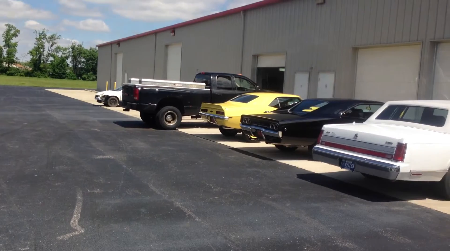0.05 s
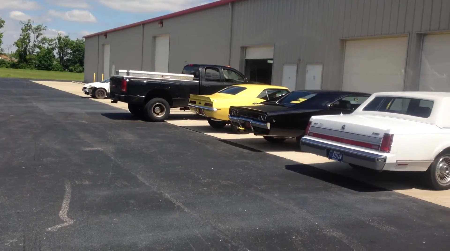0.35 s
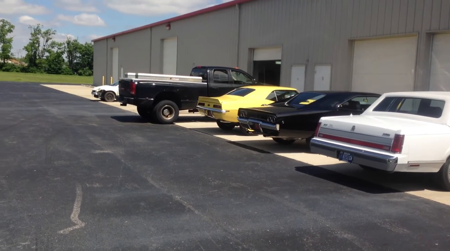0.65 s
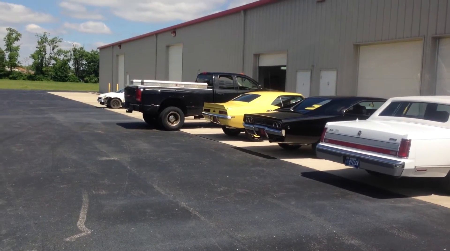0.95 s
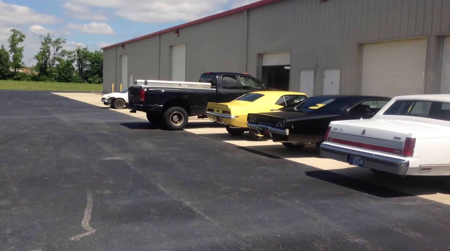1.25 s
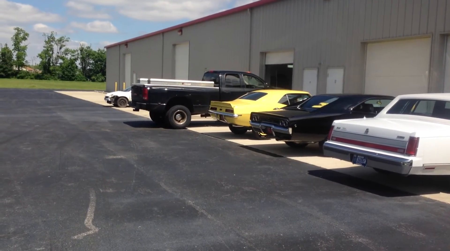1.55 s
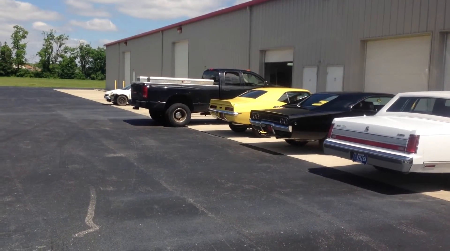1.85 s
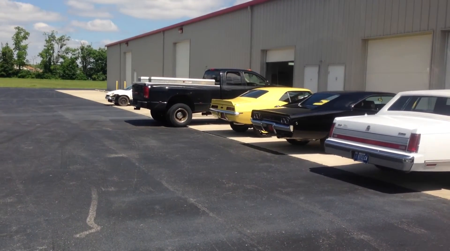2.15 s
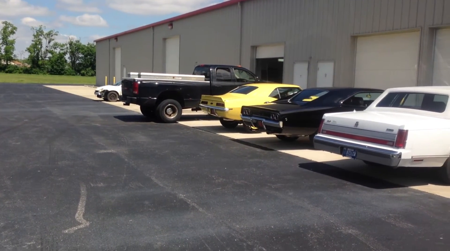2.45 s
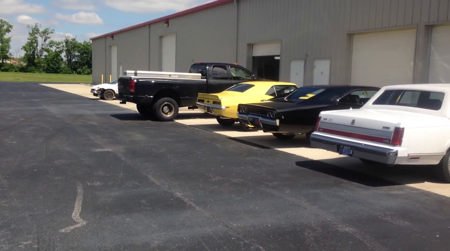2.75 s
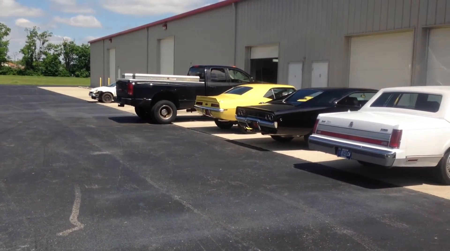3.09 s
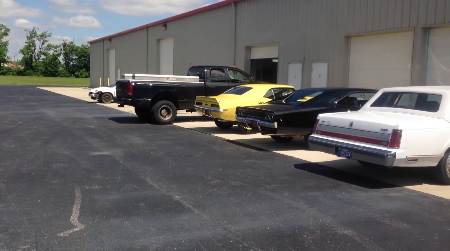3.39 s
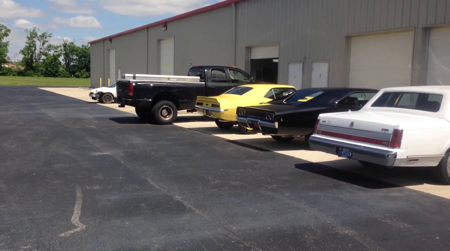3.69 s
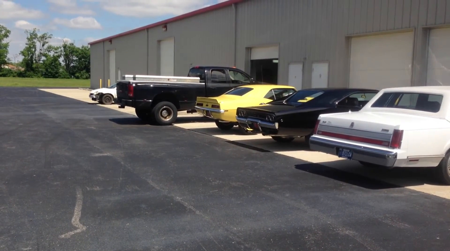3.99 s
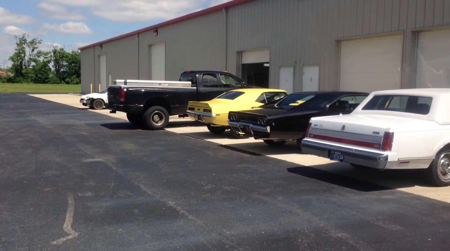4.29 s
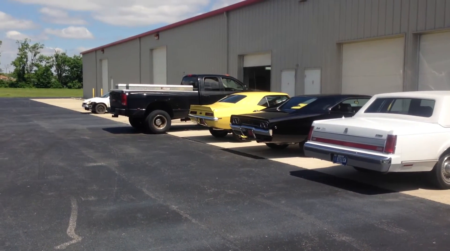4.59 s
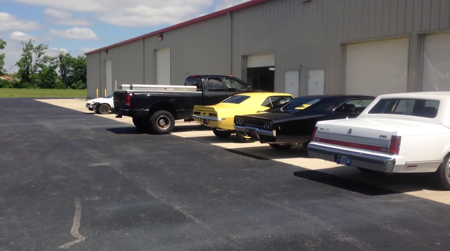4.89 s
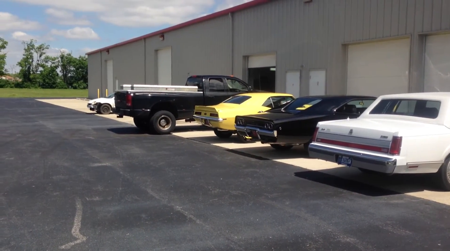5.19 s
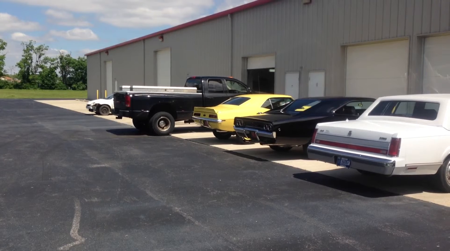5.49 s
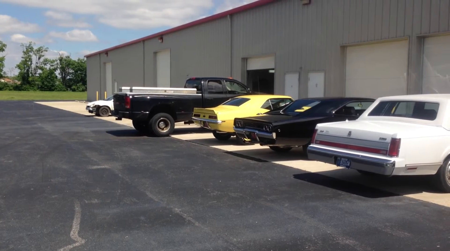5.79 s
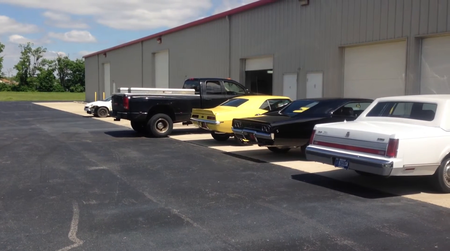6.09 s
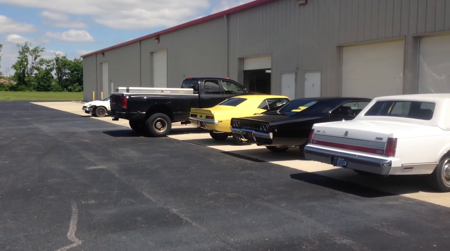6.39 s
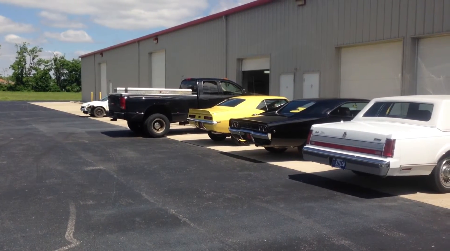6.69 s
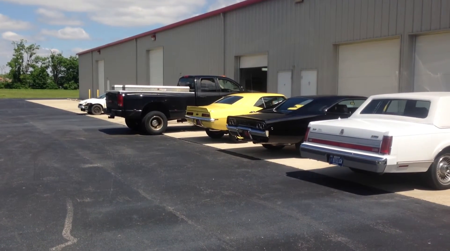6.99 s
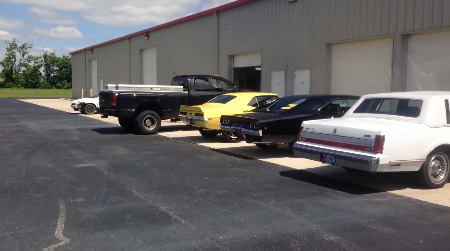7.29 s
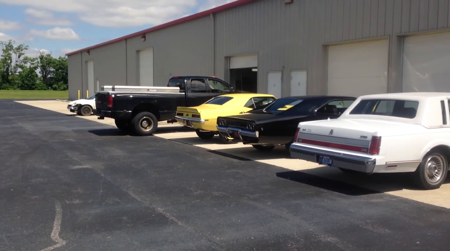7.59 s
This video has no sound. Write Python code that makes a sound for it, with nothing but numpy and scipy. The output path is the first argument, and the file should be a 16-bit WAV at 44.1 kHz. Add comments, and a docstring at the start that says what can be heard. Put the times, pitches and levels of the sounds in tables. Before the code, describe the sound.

A V8 car engine idles with a rough, loping rhythm, its exhaust booming and barking in uneven bursts with little spits of hiss and soft pops. Near the end it revs once with a pop, then climbs much harder with a loud crack and a raspy roar. It is heard from nearby in an open parking lot, with short echoes off a wall and a faint hiss of wind.

```python
"""Loping V8, revved twice

A V8 with a wild camshaft lopes at idle beside a steel workshop, then is revved twice, the second time
hard. Weak firings alternate with runs of strong ones that boom and bark in the pipes and spit hiss;
the hardest pop or bang. The wall and the parked cars answer, over a faint hiss of wind."""
import sys
import numpy as np
from scipy import signal
from scipy.fft import rfft, irfft, next_fast_len
from scipy.io import wavfile
from scipy.ndimage import uniform_filter1d, minimum_filter1d

SR = 44100
rng = np.random.default_rng(int(sys.argv[2]) if len(sys.argv) > 2 else 0)


def wav_record(signal):
    """Record a signal, one row per channel, as 16-bit PCM in the file named by sys.argv[1]."""
    frames = np.transpose(np.atleast_2d(signal))
    bounded = np.clip(frames, -1, 1)
    # unit amplitude maps onto the largest positive 16-bit level
    quanta = np.round(bounded * 32767).astype(np.int16)
    wavfile.write(sys.argv[1], SR, quanta)


N = 346185

# Charges that go off with a sharp pop. Each row: time in seconds, relative strength in dB.
POP_HITS = [(0.359, -32), (1.079, -34), (1.408, -24), (1.477, -23), (1.639, -34), (1.687, -23),
            (1.967, -24), (2.427, -30), (2.566, -26), (3.705, -22), (3.963, -21), (4.018, -20.5),
            (4.429, -24), (4.581, -26), (4.68, -28), (5.098, -27), (5.194, -37), (5.438, -34), (5.918, -24),
            (6.004, -34), (6.046, -46), (6.205, -25), (6.537, -16), (6.565, -9), (6.779, -21), (7.159, -24),
            (7.197, -23), (7.391, -19), (7.475, 1)]
# Hard bangs at full throttle. Each row: time in seconds, relative strength in dB.
BANG_HITS = [(7.543, -26), (7.755, -16.5)]
# The pipes' midrange ring at idle, then in the first rev. Each row: pitch in Hz, width in Hz, gain in dB.
COLD_BARK_MODES = [(301, 18.2, -5), (410.3, 25.2, -3), (519.6, 24.1, 1.5), (617.4, 16.4, -1.5),
                   (711.3, 30, -8)]
WARM_BARK_MODES = [(301.5, 34, -4), (426, 71, -3), (548.6, 49, 2.5), (575.8, 24, 1.5), (639, 29, -3.5),
                   (760, 94, -21), (820, 17, -21.5), (1054, 16, -15)]
# Tone of the bark and of the gas rasp. Each row: frequency in Hz, gain in dB.
BARK_EQ = [(40, -60), (130, -15.5), (290, -1.5), (400, 0.5), (650, 1), (740, -2), (860, -2), (1100, -9),
           (1500, -6), (3000, -16), (8000, -78)]
RASP_EQ = [(300, -63), (700, -5), (950, -2.5), (1120, 7), (1300, 0), (1900, 0), (2450, 0), (3200, -8.5),
           (5000, -27), (12000, -64)]


def amp(db):
    """Decibels as a gain."""
    return 10 ** (np.asarray(db) / 20)


def unit(x):
    """x at rms 1."""
    return x / np.sqrt(np.mean(x ** 2) + 1e-20)


def along(points, hz):
    """Read (Hz, value) points along a log frequency axis."""
    freqs, values = np.transpose(points)
    return np.interp(np.log(hz + 1), np.log(freqs + 1), values)


def curves(rows):
    """Automation: one value per sample for each column after the time."""
    times, *columns = np.transpose(rows)
    return [np.interp(np.arange(N) / SR, times, column) for column in columns]


def filtered(x, response):
    """x through a complex frequency response."""
    size = 2 * next_fast_len(N // 2 + SR // 2)
    return irfft(rfft(x, size) * response(np.fft.rfftfreq(size, 1 / SR)), size)[:N]


def causal(eq, hz):
    """Minimum-phase response with the gain of (Hz, dB) points."""
    grid = np.fft.rfftfreq(32768, 1 / SR)
    cepstrum = irfft(np.log(amp(along(eq, grid))))
    cepstrum[1:len(grid) - 1] *= 2
    cepstrum[len(grid):] = 0
    return np.interp(hz, grid, np.exp(rfft(cepstrum)))


def noise(eq):
    """Coloured noise of rms 1."""
    return unit(filtered(rng.standard_normal(N), lambda hz: amp(along(eq, hz))))


def steady(x, size):
    """x levelled to rms 1 over about size samples; faster throbs stay."""
    power = uniform_filter1d(uniform_filter1d(x * x, size), size)
    return x / np.sqrt(np.abs(power) + 1e-12)


def patchy(x, depth_db):
    """x at rms 1, its colour shifting at random from moment to moment."""
    spectrum = signal.stft(x, nperseg=512)[2]
    patches = uniform_filter1d(rng.standard_normal(spectrum.shape), size=4, axis=0)
    patches = uniform_filter1d(patches, size=10, axis=1)
    return unit(signal.istft(spectrum * amp(depth_db * unit(patches)), nperseg=512)[1][:N])


def kicks_at(times, sizes):
    """Single-sample impulses."""
    return np.bincount(np.clip(np.round(times * SR).astype(int), 0, N), sizes, N + 1)[:N]


def decaying(kicks, rise, t60):
    """Each kick swells to its own height and dies away; rise and t60 are in seconds."""
    t = np.arange(SR // 2) / SR
    shape = (1 - np.exp(-t / rise)) * amp(-60 * t / t60)
    return np.abs(signal.fftconvolve(kicks, shape / shape.max())[:N])


def swells(times, db, rise, t60):
    """Envelope of swells that start just ahead of the given times; their powers add."""
    return np.sqrt(decaying(kicks_at(times - .004, amp(db) ** 2), rise, t60))


def wind():
    """A faint, steady bed of moving air."""
    # Each row: frequency in Hz, gain in dB.
    air_eq = [(25, -9), (70, -14.5), (300, 6.5), (1500, -15.5), (5000, -16), (6900, -8.5), (8500, -25),
              (15000, -31)]
    return amp(-51) * noise(air_eq)


def echoed(x):
    """x with a quick slap that runs back along the pipe, then its slaps off the ground, the cars and the wall."""
    # Each row: delay in seconds, gain in dB.
    slaps = [(.0097, -13.5), (0.024, -13.5), (.041, -25)]
    return x + sum(amp(db) * np.pad(x, (int(delay * SR), 0))[:N] for delay, db in slaps)


def yard(x, wet_db):
    """Echoes plus three short diffuse tails, crossfaded so the reverb drifts with the air."""
    # Each row: frequency in Hz, seconds to fall by 60 dB.
    decay_times = [(100, 1), (600, 0.42), (3000, 0.23), (7000, 0.2), (14000, 0.12)]
    out = echoed(x)
    hz, t, spectra = signal.stft(rng.standard_normal((3, SR // 3)), SR, nperseg=256)
    fade = amp(-60 * t / along(decay_times, hz)[:, None])
    tails = signal.istft(spectra * fade, SR, nperseg=256)[1]
    for k, tail in enumerate(tails):
        share = np.cos(np.pi * (np.arange(N) / SR + k / len(tails)))
        out = out + amp(wet_db) * signal.fftconvolve(x * share, tail / np.linalg.norm(tail))[:N]
    return out


def pipe(x, modes, eq):
    """x rings the pipe's resonances, alternating in polarity, and is coloured by eq."""
    def ring(hz):
        return sum((-1) ** k * amp(db) * 1j * hz * width / (centre ** 2 - hz ** 2 + 1j * hz * width)
                   for k, (centre, width, db) in enumerate(modes))
    return filtered(x, lambda hz: ring(hz) * causal(eq, hz))


def heat():
    """Shares of cold, warm and hot gas in the pipes: idle, first rev and full throttle."""
    return curves([(6.2, 1, 0, 0), (6.5, 0, 1, 0), (7.42, 0, 1, 0), (7.56, 0, 0, 1)])


def strong_firings():
    """Runs of strong firings, unrolled into times and boom, bark and hiss levels."""
    # Each row: start in seconds, firings, spacing in seconds, relative boom, bark and hiss in dB.
    runs = [(0.126, 1, 0.0, -48, -41, -48.0), (0.203, 2, 0.046, -38.5, -40, -49),
            (0.362, 4, 0.065, -41, -40.5, -47), (0.71, 3, 0.065, -35, -38, -47.5),
            (1.017, 3, 0.058, -36.5, -38.5, -46.5), (1.248, 2, 0.053, -35.5, -44, -47.5),
            (1.408, 3, 0.051, -36.5, -39, -49), (1.586, 5, 0.055, -38, -40, -48),
            (1.866, 1, 0.065, -45, -50, -47.5), (1.962, 4, 0.066, -35.0, -41, -49),
            (2.261, 1, 0.03, -36, -39.5, -47.5), (2.426, 1, 0.0, -34, -39.5, -57),
            (2.505, 3, 0.038, -46, -41.5, -48.5), (2.724, 1, 0.0, -38, -50, -52),
            (2.852, 4, 0.052, -36, -42, -50), (3.166, 3, 0.052, -37, -41, -47.5),
            (3.401, 1, 0.0, -36, -46, -52.5), (3.462, 2, 0.03, -43, -40.5, -49),
            (3.706, 2, 0.06, -42, -41, -47.5), (3.897, 1, 0.0078, -42, -51, -50),
            (3.962, 4, 0.056, -38.5, -43, -46.5), (4.308, 2, 0.061, -37.5, -43.5, -48.5),
            (4.432, 2, 0.071, -38.5, -41.5, -49), (4.581, 1, 0.0, -49, -48, -48.0),
            (4.679, 3, 0.043, -37.5, -41, -48), (4.857, 1, 0.0, -43, -43, -52.0),
            (5.019, 3, 0.086, -36, -38, -48.5), (5.287, 1, 0.019, -38.5, -45, -53),
            (5.444, 1, 0.0, -36.5, -37, -46.5), (5.484, 1, 0.0, -38, -40.5, -45.5),
            (5.538, 2, 0.066, -42, -40, -51.0), (5.638, 2, 0.025, -38, -41, -50.0),
            (5.73, 2, 0.062, -41, -48, -51.5), (5.921, 3, 0.066, -36.5, -41, -48),
            (6.209, 3, 0.054, -38.0, -40.5, -47), (6.535, 2, 0.097, -27, -26.5, -50),
            (6.786, 2, 0.023, -30, -26.5, -54), (6.999, 1, 0.0, -31, -27.5, -50),
            (7.212, 2, 0.034, -34, -28, -48), (7.471, 1, 0.011, -26.5, -17, -42)]
    return np.transpose([(start + k * spacing, boom, bark, hiss)
                         for start, count, spacing, boom, bark, hiss in runs for k in range(count)])


def crank():
    """Firing rate and phase in cycles: each strong firing kicks the crank ahead, then it sags."""
    # Idle and two revs. Each row: time in seconds, firings per second before the lope is added.
    speed = [(0, 72), (6.2, 66), (6.4, 85.4), (6.55, 112.6), (6.65, 121), (6.77, 141), (7.0, 139),
             (7.3, 136), (7.44, 164), (7.55, 200), (7.6, 235), (7.68, 244), (7.75, 262), (7.85, 262)]
    lope_hz = 4
    times = strong_firings()[0]
    surge = decaying(kicks_at(times, np.ones(len(times))), rise=0.0999, t60=0.9)
    rate = curves(speed)[0] + lope_hz * (surge - surge.mean())
    cycles = np.cumsum(rate) / SR
    return rate, cycles - cycles[-1]


def firings(rate, cycles):
    """One pressure pulse per firing: ragged at idle, more even on the throttle."""
    # The two banks reach the ear unequally. Each entry: a cylinder's level in dB, in firing order.
    cylinder_db = [-1.5, -5.5, -1.5, 5, -9.5, -0.5, -15, -1]
    # Each row: time in seconds, scale of the scatter in strength and timing.
    roughness = [(6.3, 1.2), (6.6, 0.7), (7.2, 0.71), (7.45, 0.6), (7.6, 0.4), (7.85, 0.6)]
    onsets = np.flatnonzero(np.diff(np.floor(cycles)))
    countdown = np.round(-cycles[onsets]).astype(int)
    time_scatter, size_scatter = rng.standard_normal((1024, 2))[countdown].T
    rough = curves(roughness)[0][onsets]
    bank_db = np.take(cylinder_db, -countdown, mode="wrap")
    size_db = bank_db + 3.75 * rough * size_scatter
    far_bank_delay = 0.00048 * (bank_db < 0)
    times = onsets / SR + far_bank_delay + 0.055 * rough * time_scatter / rate[onsets]
    # Each strong firing, pop or bang takes over the nearest pulse with a full charge.
    for cue in [*strong_firings()[0], *np.transpose(POP_HITS)[0], *np.transpose(BANG_HITS)[0]]:
        nearest = np.argmin(np.abs(times - cue))
        times[nearest], size_db[nearest] = cue - .001, 4
    return kicks_at(times, amp(size_db))


def gas_jet(throb):
    """On the throttle the gas jet rasps and hisses in time with the firings."""
    # Each row: time in seconds, relative rasp and hiss in dB.
    flow = [(6.2, -78, -70), (6.212, -70, -60), (6.456, -55, -41.5), (6.796, -49, -43.5), (6.952, -54, -52),
            (7.298, -47.5, -43), (7.6, -36, -30.5), (7.78, -28.5, -35), (7.85, -40, -33.5)]
    # Each row: frequency in Hz, gain in dB.
    hiss_eq = [(1650, -15.5), (3000, -13), (5200, -9.5), (6200, -5), (6900, 1), (7400, -8), (8100, -19),
               (10000, -30.5), (12500, -40), (15000, -66)]
    rasp_db, hiss_db = curves(flow)
    rasp = amp(rasp_db - 4) * noise(RASP_EQ) * steady(0.5 + throb, size=2000)
    hiss = amp(hiss_db + 0.5) * noise(hiss_eq) * steady(0.29 + throb, size=2000)
    return rasp + hiss


def spitting(throb):
    """With each strong firing the pipes spit sharply, puff out hiss and ring faintly."""
    # Tone of the puff, its bright attack and the steel. Each row: frequency in Hz, gain in dB.
    puff_eq = [(1500, -26), (2800, -12.5), (3200, -12.5), (3970, -6.5), (4630, -9.5), (5600, -8.5),
               (6400, -5.5), (6900, 0), (7400, -6), (8200, -16.5), (10000, -32), (15000, -55)]
    spit_eq = [(2000, -28), (3700, -27), (5500, -5), (7000, 15), (8500, -2.5), (10500, -11), (15000, -42)]
    clatter_eq = [(500, -44), (900, -2), (2700, -1), (3500, -18.5), (6000, -26), (12000, -67)]
    # The thin steel of the pipes. Each row: pitch in Hz, width in Hz, gain in dB.
    steel_modes = [(1010, 27, -6.5), (1084, 23, -0.5), (1404, 23, -1.5), (1565, 29, -1.5), (1748, 71, 0),
                   (1872, 38, -0.5), (2030, 38, -6), (2224, 32, 1), (2405, 64, -3.5), (2695, 22, -2.5)]
    times, _, _, hiss_db = strong_firings()
    flutter = steady(1 + 0.36 * throb, size=4000)
    puff_level = swells(times, hiss_db, rise=0.022, t60=0.14)
    spit_level = swells(times, hiss_db + 3.4 * rng.standard_normal(len(times)), rise=0.01, t60=0.097)
    puffs = amp(-1.4) * puff_level * patchy(echoed(noise(puff_eq)), depth_db=3)
    spits = amp(-6) * spit_level * patchy(noise(spit_eq), depth_db=2)
    # Some firings shake the steel much harder than others.
    flares = swells(times, hiss_db + 4.5 * rng.standard_normal(len(times)), rise=0.01, t60=0.17)
    shaking = (1.16 + unit(flares)) * flutter * rng.standard_normal(N)
    clatter = amp(-60.5) * unit(pipe(shaking, steel_modes, clatter_eq))
    return flutter * (puffs + spits) + clatter


def bangs():
    """At full throttle two charges go off harder and crack out of the tailpipe."""
    times, db = np.transpose(BANG_HITS)
    return amp(-9) * decaying(kicks_at(times, amp(db)), rise=0.0011, t60=0.052) * noise(RASP_EQ)


def pops():
    """The hardest firings leave the pipe as sharp, hollow pops, pitched by the heat of the gas."""
    drive_db = 31.5
    times, db = np.transpose(POP_HITS)
    cold, _, _ = heat()
    blows = kicks_at(times - .001, amp(db + drive_db))
    gas = echoed(blows + 0.065 * decaying(blows, rise=.001, t60=0.035) * rng.standard_normal(N))
    cold_pops = pipe(gas * cold, COLD_BARK_MODES, BARK_EQ)
    warm_pops = pipe(gas * (1 - cold), WARM_BARK_MODES, BARK_EQ)
    return cold_pops + amp(-3) * warm_pops


def singing(hz, cycles):
    """A clear note that blooms as its pitch passes a resonance of the pipes."""
    # Each row: pitch in Hz, width in Hz, gain in dB.
    modes = [(130.5, 21.5, 5.5), (258, 43, 2.5), (510, 87, 3)]
    gain = sum(amp(db) / (1 + (1.2 * (hz - centre) / width) ** 2) for centre, width, db in modes)
    return gain * np.sqrt(2) * np.sin(2 * np.pi * cycles)


def exhaust_levels():
    """Boom and bark envelopes: the ordinary firings plus the swells of the strong ones."""
    # Each row: time in seconds, relative boom and bark in dB.
    ordinary_levels = [(-0.0, -40, -44.0), (1.1, -38, -41.5), (2.2, -34.5, -45.5), (2.5, -40, -43.5),
                       (6.19, -41.5, -47.5), (6.49, -29, -26), (6.57, -20, -34), (6.71, -25.5, -27.5),
                       (6.76, -21, -28), (6.97, -31.5, -34.5), (7.17, -27.5, -30), (7.36, -17.5, -24),
                       (7.56, -23, -14), (7.73, -19, -9.5), (7.85, -33.5, -22.5)]
    boom_db, bark_db = curves(ordinary_levels)
    times, strong_boom_db, strong_bark_db, _ = strong_firings()
    boom_swells = swells(times, strong_boom_db, rise=0.026, t60=0.14)
    bark_swells = amp(1.5) * swells(times, strong_bark_db, rise=0.033, t60=0.14)
    return np.hypot(amp(boom_db), boom_swells), np.hypot(amp(bark_db), bark_swells)


def exhaust(pulses, rate, cycles):
    """Pulses and their turbulence boom and bark in the pipes, whose notes shift as the gas heats."""
    # Pipe resonances by gas heat. Each row: pitch in Hz, width in Hz, gain in dB.
    cold_boom_modes = [(102.6, 6.7, -1), (138.8, 15, -2), (200.2, 16, -2.5)]
    warm_boom_modes = [(112.4, 26, -3.5), (141.6, 21, 2.5), (219.2, 18, -0.5)]
    hot_boom_modes = [(158.5, 20, 9), (226, 17, -5.5), (250, 24, -7)]
    hot_bark_modes = [(378, 68, -5.5), (488, 64, 0), (579, 46, 3.5), (639, 76, -0.5), (700, 53, -2),
                      (802, 67, -11.5), (1094, 67, -8)]
    # Tone of the boom below and at full throttle. Each row: frequency in Hz, gain in dB.
    boom_eq = [(30, -61), (72, -30), (98, 4), (225, 1), (300, -18), (600, -25.5), (3000, -59.5)]
    hot_boom_eq = [(30, -70), (90, -45), (132, 3), (265, 5), (310, -6), (600, -40), (3000, -81)]
    boom_level, bark_level = exhaust_levels()
    idling, first_rev, flat_out = heat()
    swirl = decaying(pulses, rise=0.0016, t60=0.02) * rng.standard_normal(N)
    cold = yard((pulses + 0.042 * swirl) * idling, wet_db=-7.5)
    warm = yard((pulses + 0.086 * swirl) * first_rev, wet_db=-6.5)
    hot = yard((pulses + 0.041 * swirl) * flat_out, wet_db=-6)
    boom = (pipe(cold, cold_boom_modes, boom_eq)
            + pipe(warm, warm_boom_modes, boom_eq)
            + pipe(hot, hot_boom_modes, hot_boom_eq))
    bark = (pipe(cold, COLD_BARK_MODES, BARK_EQ)
            + pipe(warm, WARM_BARK_MODES, BARK_EQ)
            + pipe(hot, hot_bark_modes, BARK_EQ))
    # The harder the load, the more the firings merge into a clear note and its octave.
    note = (1 - idling) * (boom_level / amp(-20.5)) ** 1.9 * singing(rate, cycles)
    octave = (1 - idling) * (bark_level / amp(-9.5)) ** 1.3 * singing(2 * rate, 2 * cycles)
    boom = steady(boom, size=3000) + note
    bark = steady(patchy(bark, depth_db=1.7), size=3000) + octave
    return (amp(1) * boom_level * steady(boom, size=1800)
            + amp(-0.52) * bark_level * steady(bark, size=1400))


def scene():
    """The engine's layers, tied to one train of firings, over the wind; in mono."""
    rate, cycles = crank()
    pulses = firings(rate, cycles)
    throb = steady(decaying(pulses, rise=0.00032, t60=0.15), size=4000)
    return (wind() + exhaust(pulses, rate, cycles) + pops() + spitting(throb) + gas_jet(throb)
            + bangs())[None]


def record(dry):
    """A limiter holds down the loudest peaks and a steep low-pass trims the top."""
    ceiling, top_hz = 0.7, 15310
    needed = np.minimum(1, ceiling / (np.abs(dry[0]) + 1e-9))
    gain = uniform_filter1d(minimum_filter1d(needed, size=500), size=400)
    return filtered(dry[0] * gain, lambda hz: hz < top_hz)[None]


dry = scene()
out = record(dry)
wav_record(out)
```